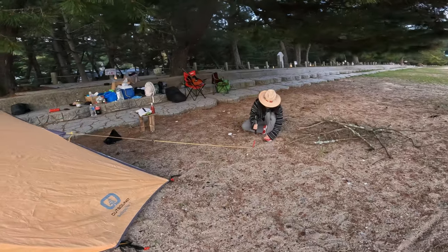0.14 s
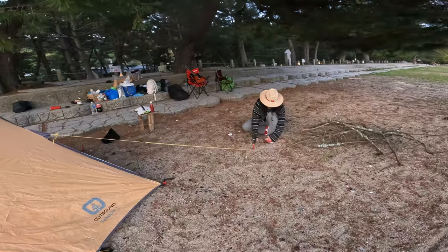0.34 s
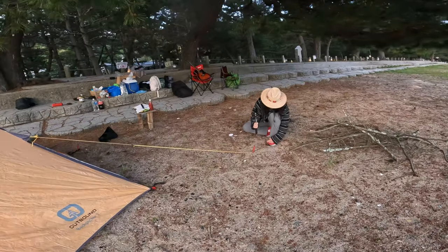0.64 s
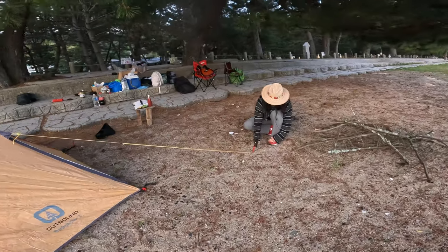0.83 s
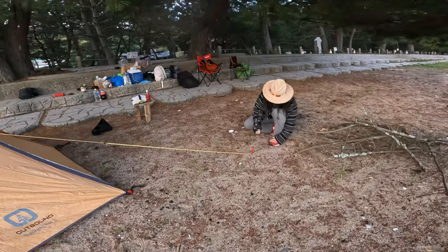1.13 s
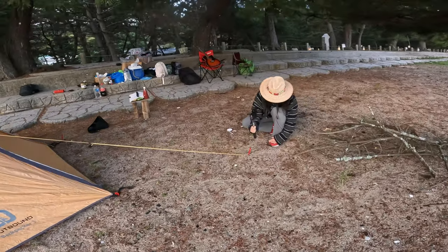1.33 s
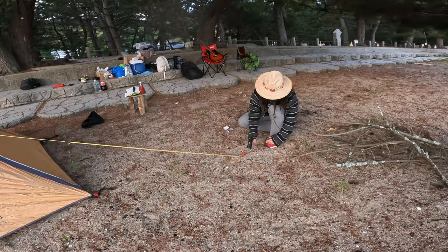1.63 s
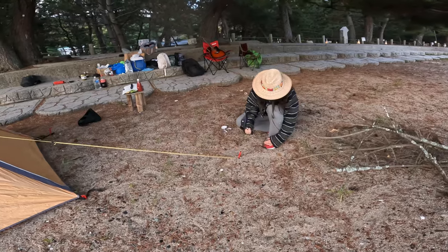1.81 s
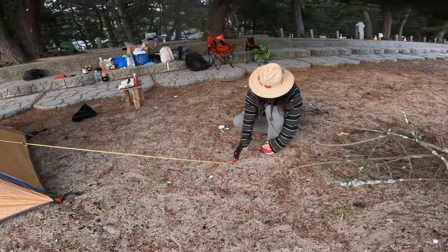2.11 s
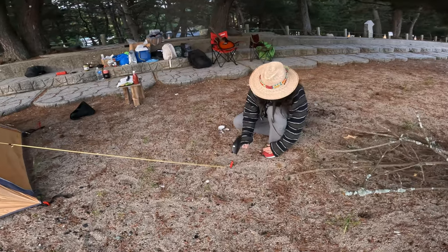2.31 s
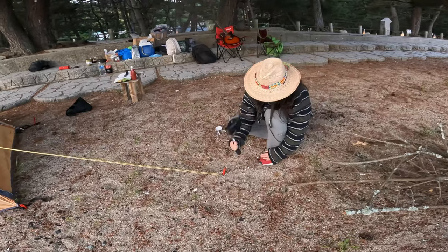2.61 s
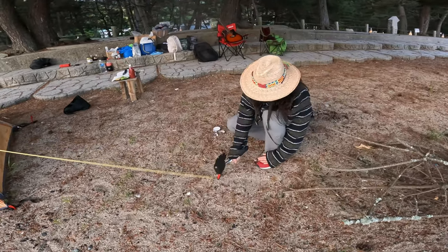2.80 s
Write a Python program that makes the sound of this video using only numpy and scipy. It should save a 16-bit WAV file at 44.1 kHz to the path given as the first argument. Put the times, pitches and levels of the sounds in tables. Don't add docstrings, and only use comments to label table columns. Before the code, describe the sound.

Five hard, quickly damped metal hits on a tent peg, the first duller and the fourth loudest, each with brief outdoor scatter. A handheld stereo microphone walks closer over crackling needles and twigs, with very faint bird whistles.

```python
import sys
import numpy as np
from scipy import signal
from scipy.fft import rfft, irfft
from scipy.io import wavfile
from scipy.ndimage import uniform_filter1d

SR = 44100
rng = np.random.default_rng(int(sys.argv[2]) if len(sys.argv) > 2 else 0)


def master_out(mix):
    frames = np.transpose(np.atleast_2d(mix))
    ceiling = np.clip(frames, -1, 1)
    pcm = np.round(ceiling * 32767).astype(np.int16)
    wavfile.write(sys.argv[1], SR, pcm)


def level_to_linear(level):
    exponent = np.asarray(level, float) / 20
    return 10 ** exponent


N = 130095
T = np.arange(N) / SR
OPPOSITE = np.array([[1], [-1]])

# start_s, ring_db, ring_length_s, tilt_db_per_octave, thump_db
BLOWS = [
    (0.4022, -10.5, 0.0096, -0.5, -16),
    (0.9826, -7, 0.0069, 1, -16),
    (1.6146, -4, 0.0078, 0.6, -17),
    (2.2469, -2.5, 0.0056, 0.5, -9),
    (2.876, -4, 0.0065, 0.5, -12.5),
]
# mode_3530hz_db, mode_4030hz_db, mode_7694hz_db, grit_db, upper_ground_wave_db
LANDING = [(0, 2, 0, -6, 2.5), (1, 3, -2.5, -7, 3.5), (0.4, -3.5, -4.5, -7.5, 2), (1.5, 3.5, -2.5, -7, -8),
           (-3, 8.5, 2.5, -3.5, -7.5)]
SNAP_PAN_DB = 7


def level(x, db):
    return x * level_to_linear(db) / np.sqrt(np.mean(x ** 2))


def band(x, hz, width_oct):
    edge_hz = np.clip(hz * 2. ** np.array([-width_oct / 2, width_oct / 2]), 10, .45 * SR)
    return signal.sosfilt(signal.butter(2, edge_hz, "band", fs=SR, output="sos"), x)


def curve(points):
    p = np.array(points, float)
    bin_hz = np.arange(N // 2 + 1) * SR / N
    return np.interp(np.log(bin_hz + 1), np.log(p[:, 0]), p[:, 1])


def colour(points, alike):
    white = rng.standard_normal((2, N))
    mid, side = irfft(rfft(white) * level_to_linear(curve(points)), N)
    c = np.clip(alike, 0, 1)
    return np.sqrt(1 + c) * mid + np.sqrt(1 - c) * side * OPPOSITE


def walk(rate_hz):
    k = int(SR / rate_hz)
    held = np.repeat(rng.standard_normal(N // 200 + 1), 200)[:N]
    w = uniform_filter1d(uniform_filter1d(held, k), k)
    return w / w.std()


def add(out, x, s):
    i = int(s * SR)
    out[..., i:i + x.shape[-1]] += x[..., :out.shape[-1] - i]


def pan_snap(x, peak_db, draw):
    return x * level_to_linear(peak_db + SNAP_PAN_DB * draw * OPPOSITE / 2) / np.abs(x).max()


def ports(x, left_db=-1.3):
    # freq_hz, phase_rad
    port_phase = [(100, -0.038), (3960, -0.58), (7900, -0.68), (8600, -1.8), (10200, -4), (11700, 0.46),
                  (14000, -0.34)]
    treble_db = left_db / 2 * curve([(200, 0), (1200, 1)])
    half = level_to_linear(treble_db) * np.exp(.5j * curve(port_phase))
    return irfft(rfft(x) * np.array([half, 1 / half]), N)


def woods():
    # freq_hz, density_db_per_hz
    hiss_spectrum = [(150, 0), (250, 1), (700, -3), (1150, 4), (2240, -0.5), (4000, -9.5), (7500, -14.5),
                     (16000, -21)]
    # freq_hz, density_db_per_hz
    rumble_spectrum = [(8.8, -50), (15, -7.5), (43, -2), (65, -11.5), (87, -11), (109, -22.5), (135, -21.5),
                       (300, -38), (390, -71), (660, -120)]
    # time_s, rumble_db
    gusts = [(0.0, -41), (1.52, -43), (2.95, -41.5)]
    hiss = level(colour(hiss_spectrum, 0.731), -59) * level_to_linear(1.3 * walk(4))
    rumble = level(colour(rumble_spectrum, 0.9457), 0)
    gust_db = np.interp(T, *np.array(gusts).T) + 1.5 * walk(8)
    return hiss + rumble * level_to_linear(gust_db)


def steps():
    # start_s, length_s, level_db, centre_hz
    footfalls = [(0.031, 0.053, -57.5, 1020), (0.272, 0.17, -58.5, 4700), (0.334, 0.18, -49, 580),
                 (0.417, 0.078, -70, 3150), (0.866, 0.057, -58, 4800), (0.993, .19, -50, 650),
                 (1.056, 0.1, -54, 3300), (1.215, 0.16, -59, 6040), (1.492, 0.03, -51.5, 3000),
                 (1.592, 0.22, -48.5, 740), (1.68, 0.12, -53, 4960), (1.819, 0.55, -61.5, 756),
                 (2.137, 0.078, -58.5, 3720), (2.19, 0.249, -53, 684), (2.305, 0.16, -59, 4060),
                 (0.771, 0.13, -61, 625), (2.834, 0.13, -54.5, 1500)]
    grains_per_s, grain_db, patchy_db, width_oct = 2400, 3.3, 2.8, 2.3
    rise_s, fall_s = .035, .018
    out, t = np.zeros((2, N)), T[:SR // 2]
    for s, length_s, db, hz in footfalls:
        hit = rng.random(len(t)) < grains_per_s / SR
        size_db = grain_db * np.minimum(rng.exponential(size=len(t)), 4)
        grains = hit * level_to_linear(size_db) * rng.standard_normal(len(t))
        grains = grains + .5 * rng.standard_normal(len(t))
        mid_oct = width_oct * min(1, 3000 / hz) ** .5
        mid = level_to_linear(patchy_db * walk(56)[:len(t)]) * level(band(grains, hz, mid_oct), db)
        side = level(band(rng.standard_normal(len(t)), hz * 1.6, width_oct), db - 12.0)
        shape = (1 - np.exp(-t / rise_s)) * np.exp(-np.maximum(t - length_s, 0) / fall_s)
        add(out, (mid + side * OPPOSITE) * shape, s)
    return out


def snaps():
    # start_s, peak_db, centre_hz, t60_s
    breaks = [(.044, -40, 1220, 0.009), (2.793, -44.5, 6500, 0.01), (.333, -39, 3000, 0.076),
              (.37, -34.5, 1070, 0.064), (0.3982, -25, 1790, 0.0025), (0.462, -40, 1280, 0.0073),
              (.535, -44, 3200, 0.052), (0.5453, -39.5, 3530, 0.0086), (.739, -54, 6100, 0.011),
              (0.826, -38.5, 2485, 0.035), (0.846, -40.5, 1410, 0.0073), (1.0275, -19.5, 3240, 0.01),
              (1.1306, -32, 1400, 0.01), (1.14, -30.5, 3080, 0.009), (1.25, -38.5, 4850, 0.026),
              (1.356, -41, 4960, 0.01), (1.496, -41, 2000, 0.11), (1.509, -41, 6280, 0.0055),
              (1.532, -47, 5000, 0.0056), (1.9174, -43.5, 2216, 0.006), (1.931, -36.5, 960, 0.014),
              (2.085, -42, 1500, 0.011), (2.108, -52, 5000, 0.01), (2.13, -31, 2520, 0.035),
              (2.151, -40, 3140, 0.059), (2.171, -39.5, 4930, 0.017), (2.557, -44, 6487, 0.0137),
              (2.775, -44, 3260, 0.098), (2.75, -33.5, 2650, 0.031), (2.31, -34.5, 3000, 0.014)]
    width_oct = 1.87
    out, t = np.zeros((2, N)), T[:SR // 10]
    for s, db, hz, t60_s in breaks:
        r = rng.standard_normal(len(t) + 1)
        x = r[1:] * level_to_linear(-60 * t / max(t60_s, .003)) * (1 - np.exp(-t / 0.00035))
        x = band(band(x, hz, width_oct), hz, width_oct)
        add(out, pan_snap(x, db, r[0]), s)
    return out


def crackle():
    # start_s, peak_db, centre_hz
    ticks = [(.266, -49, 5600), (.308, -55, 3070), (.356, -44, 3630), (.892, -50, 3600), (.905, -52, 8050),
             (1.247, -41, 6500), (1.2515, -44, 7500), (1.264, -40, 6000), (1.269, -44, 6200),
             (1.29, -55, 7000), (1.301, -48, 6500), (1.308, -46, 5700), (1.329, -51.5, 7500),
             (1.338, -60, 7000), (1.351, -51, 4000), (1.363, -47, 7000), (1.3755, -55, 8000),
             (1.397, -44, 5500), (1.427, -51, 5800), (1.689, -40, 4000), (1.75, -34, 2500),
             (1.789, -43, 8040), (1.798, -55, 6000), (1.817, -52, 1800), (1.829, -50, 4790),
             (1.96, -53, 1100), (2.05, -50.5, 7180), (2.066, -54, 7600), (2.209, -45, 1000),
             (2.2134, -46, 3520), (2.448, -50, 4400), (2.724, -49, 10000), (0.097, -45, 1200),
             (1.144, -35, 2630)]
    t60_s, width_oct = 0.017, 0.7
    out, t = np.zeros((2, N)), T[:SR // 40]
    for s, db, hz in ticks:
        r = rng.standard_normal(len(t) + 1)
        x = band(r[1:] * level_to_linear(-60 * t / t60_s), hz, width_oct)
        add(out, pan_snap(x, db, r[0]), s)
    return out


def stake_ring():
    # freq_hz, level_db, t60_s, echo_db
    stake_modes = [(1293, -6.5, .015, -51), (1672, -1.5, 0.011, -5), (2000, -11, 0.018, -22.5),
                   (2554.3, -3.5, 0.012, 1.5), (2828, -1.5, 0.015, -4.5), (3530, 3.5, 0.016, 3.5),
                   (4030, -6.5, 0.022, -1.5), (4445, -7, 0.015, -1), (4796.5, -12.5, 0.02, -13.5),
                   (5663, -3.5, 0.0072, -36), (3256, -8, 0.03, -4.5), (7694, -1.5, 0.012, -0.5),
                   (10700, -30.5, 0.0119, -29), (11700, -27.5, 0.0046, -25)]
    # low_three_pitch_factor, then mode_1672hz_db, mode_2000hz_db,
    # mode_2554hz_db, mode_2828hz_db
    depth = [(0.931, 0, 11.5, 2, 5), (1.028, 2.5, 6, 3.8, 1.5), (0.998, -1.5, 5, -1, 0.5),
             (0.93, -1.5, 0.5, 1.5, -8.5), (0.994, 0, 2.5, 1.5, -5.5)]
    # crack_db, contact_s
    contacts = [(9, .00008), (4, .000085), (3, .00009), (3, .000085), (7, .00005)]
    detune, phase_scatter_rad, scatter_db = .006, .5, 2
    crack_late_s, crack_hz, grit_s, grip_s = 0.000485, 3000, 0.0044, 0.0016
    approach_db_per_s = 4.5
    ring, far, t = np.zeros(N), np.zeros(N), T[:SR // 2]
    hz, db, t60_s, echo_db = np.array(stake_modes).T[:, :, None]
    for blow, landing, sunk, contact in zip(BLOWS, LANDING, depth, contacts):
        s, blow_db, hold_s, tilt_db, _ = blow
        *strong_db, grit_db, _ = landing
        sink, *low_db = sunk
        crack_db, contact_s = contact
        pitch_draw, phase_draw, mode_db = rng.standard_normal((3, len(stake_modes), 1))
        mode_db *= scatter_db
        mode_db[[5, 6, 11], 0] = strong_db
        mode_db[1:5, 0] = low_db
        pitch_draw[:3] = (sink - 1) / detune
        phase = 2 * np.pi * hz * (1 + detune * pitch_draw) * (t - crack_late_s)
        wave = np.sin(phase + np.pi / 2 + phase_scatter_rad * phase_draw) * level_to_linear(-60 * t / t60_s)
        wave = wave * level_to_linear(blow_db + mode_db + tilt_db * np.log2(hz / 3500))
        release = 1 + np.exp(np.minimum((t - hold_s) / grip_s, 50))
        grip = (1 - np.exp(-t / 0.0012)) / release
        pulse = np.exp(-((t - crack_late_s) / contact_s) ** 2) / 4
        crack = band(pulse, crack_hz, 4.56) * level_to_linear(blow_db + crack_db)
        grit = rng.standard_normal(len(t)) * np.exp(-t / grit_s) * grip
        crack += band(grit, 3000, 3.02) * level_to_linear(blow_db + grit_db)
        add(ring, (wave * level_to_linear(db)).sum(0) * grip + crack, s + 0.001217)
        echo_feed = (wave * level_to_linear(echo_db - 60 * t / 0.023)).sum(0) * grip + level_to_linear(1) * crack
        add(far, echo_feed * level_to_linear(-approach_db_per_s * s), s)
    return ring, far


def early_hiss(x):
    size = int(0.018 * SR)
    spread = rng.standard_normal(2000)[:size] * np.linspace(.3, 1, size) * level_to_linear(-33.5 - 19.0)
    return x + np.roll(signal.fftconvolve(x, spread)[:N], -size)


def ground_thump():
    # delay_s, start_hz, end_hz, level_db, rise_s, t60_s
    ground_waves = [
        (0.01055, 126.7, 23, -2.24, 0.0042, 0.13),
        (0.0038, 216, 180, -4, 0.0052, 0.087),
        (0.0013, 385, 390, -11, 0.001, 0.034),
    ]
    # deep_delay_s, upper_delay_s, upper_pitch_factor
    ground_paths = [(0.0023, 0.011, .85), (0.0015, .001, 0.896), (-0.0017, -.001, 0.784),
                    (-0.0005, -0.0042, 1.014), (0.0001, 0.0001, 1.2)]
    soil_db, soil_hz, soil_t60_s = -18, 118.2, 0.33
    thump, t = np.zeros(N), T[:SR // 2]
    for (s, *_, thump_db), (*_, upper_db), path in zip(BLOWS, LANDING, ground_paths):
        deep_s, upper_s, upper_pitch = path
        changes = [(0, deep_s, 1), (upper_db, upper_s, upper_pitch), (0, 0, 1)]
        for ground_wave, (extra_db, later_s, pitch) in zip(ground_waves, changes):
            delay_s, start_hz, end_hz, wave_db, rise_s, t60_s = ground_wave
            glide_hz = end_hz + (start_hz - end_hz) * np.exp(-t / 0.023)
            turns = pitch * np.cumsum(glide_hz) / SR
            fade = level_to_linear(-60 * t / t60_s + wave_db + thump_db + extra_db)
            shape = (1 - np.exp(-(t / rise_s) ** 2)) * fade
            add(thump, np.sin(2 * np.pi * turns) * shape, s + delay_s + later_s)
        soil = band(rng.standard_normal(len(t)), soil_hz, 2.0)
        soil = level(soil, thump_db + soil_db + upper_db)
        add(thump, soil * (1 - np.exp(-(t / 0.0026) ** 2)) * level_to_linear(-60 * t / soil_t60_s), s)
    return thump


def returns():
    # start_s, freq_hz, level_db, t60_s
    rebounds = [(0.4067, 4080, -11.5, 0.022), (.423, 4080, -23.5, 0.044), (.423, 7700, -28, 0.026),
                (.433, 2830, -27, 0.025), (0.431, 4050, -28, .03), (.44, 4080, -38.5, 0.1),
                (1.003, 4030, -20, 0.055), (1.014, 4030, -23, .05), (1.004, 7700, -31, 0.023),
                (1.0282, 2800, -17.5, 0.011), (1.0284, 5400, -24, 0.01), (1.064, 4040, -40, 0.085),
                (1.6195, 3580, -13, 0.02), (1.648, 3950, -26.5, 0.037), (1.676, 4030, -42.5, 0.13),
                (2.2505, 3495, -9, 0.013), (2.266, 3500, -42, 0.017), (2.28, 4000, -37, 0.022),
                (2.9, 4010, -36, 0.024), (2.911, 4010, -39, 0.06), (2.9, 7660, -41, 0.033)]
    rise_share = .04
    out, t = np.zeros(N), T[:SR // 5]
    for s, hz, db, t60_s in rebounds:
        shape = (1 - np.exp(-t / (rise_share * t60_s))) * level_to_linear(db - 60 * t / t60_s)
        add(out, np.sin(2 * np.pi * hz * t) * shape, s)
    return out


def echoes(x):
    # delay_s, rise_s, level_db, t60_s
    reflections = [
        (0.0088, 0.0017, -14.5, 0.25),
        (0.0093, .001, -37.5, 0.069),
        (0.019, .004, -30.5, 0.44),
        (0.13, 0.012, -43, 1),
    ]
    t, out = T[:SR // 2], np.zeros((2, N))
    tail = np.zeros(len(t))
    for delay_s, rise_s, db, t60_s in reflections:
        since_s = np.maximum(t - delay_s, 0)
        tail += level_to_linear(db - 60 * since_s / t60_s) * (1 - np.exp(-since_s / rise_s))
    grain = level(colour([(100, 8.0), (3000, -9.0), (16000, -4.0)], 0.76), -20)
    for s, *_ in BLOWS:
        i = int(s * SR)
        scatter = np.roll(grain, -i, axis=1)[:, :len(t)] * tail
        add(out, signal.fftconvolve(x[None, i:i + SR // 20], scatter), s)
    return out


def birds():
    # start_s, length_s, pitch_hz, level_db
    whistles = [
        (0.595, 0.056, 2303, -60.5),
        (1.39, 0.036, 1790, -57),
        (1.45, 0.052, 1786, -58),
        (2.645, 0.03, 1815, -61.5),
        (2.679, 0.045, 2736, -62),
    ]
    out = np.zeros(N)
    for s, length_s, hz, db in whistles:
        t = T[:int(length_s * SR) + 2]
        add(out, level_to_linear(db) * np.sin(np.pi * t / t[-1]) * np.sin(2 * np.pi * hz * t), s)
    return out


def scene():
    ring, far = stake_ring()
    steel = ports(early_hiss(ring) + returns())
    underfoot = steps() + snaps() + crackle()
    return woods() + underfoot + steel + ground_thump() + echoes(far) + ports(birds(), left_db=-5.0)


def top_cut(x):
    return signal.sosfilt(signal.butter(12, 16230, fs=SR, output="sos"), x)


def record(dry):
    # freq_hz, gain_db
    microphone = [(6500, 1.8), (7800, -0.5), (8600, -6), (9500, -10), (11500, -2.5), (13200, -7.5),
                  (15800, -22), (16500, -69)]
    ceiling = 1.6
    x = irfft(rfft(dry) * level_to_linear(curve(microphone)), N)
    return top_cut(ceiling * np.tanh(x / ceiling))


dry = scene()
out = record(dry)
master_out(out)
```